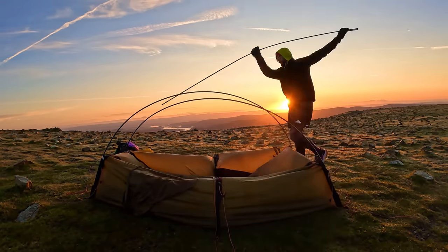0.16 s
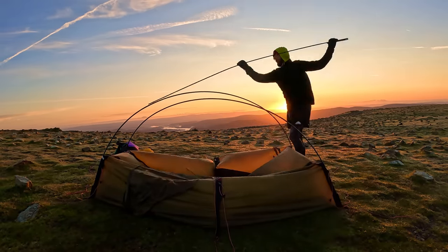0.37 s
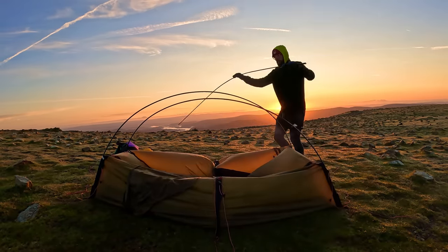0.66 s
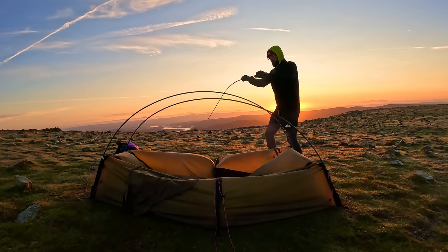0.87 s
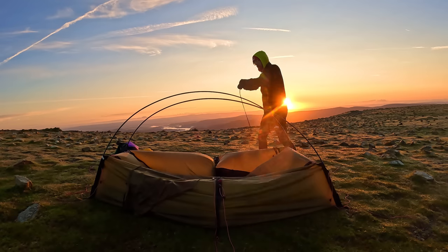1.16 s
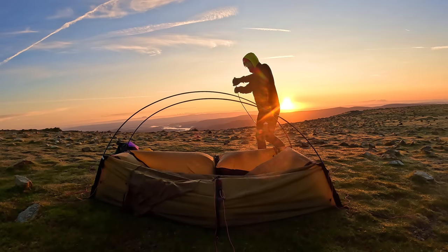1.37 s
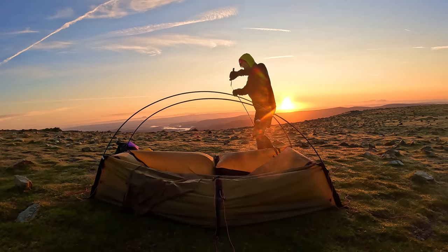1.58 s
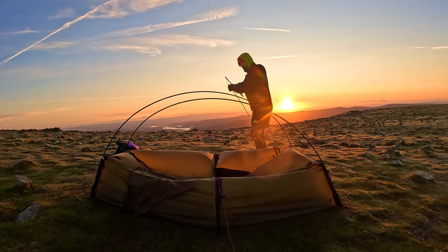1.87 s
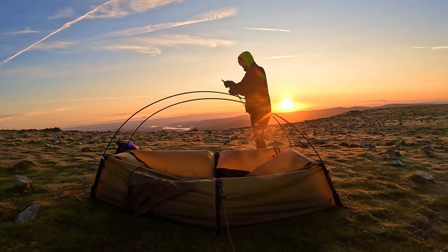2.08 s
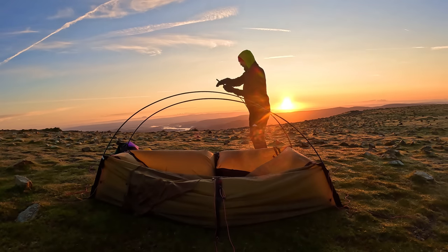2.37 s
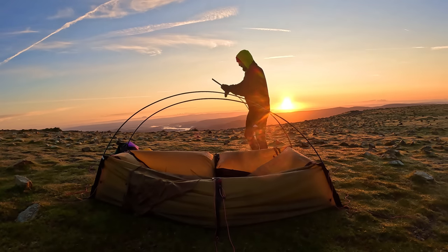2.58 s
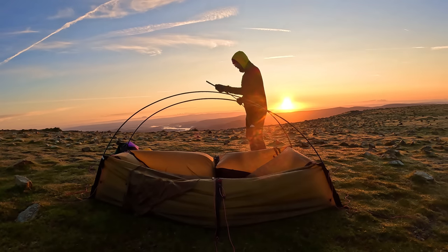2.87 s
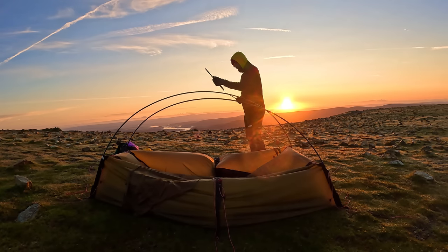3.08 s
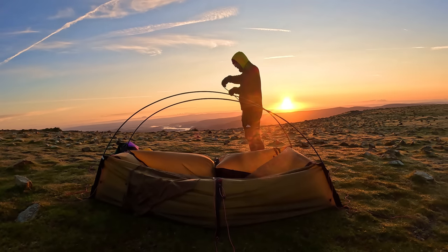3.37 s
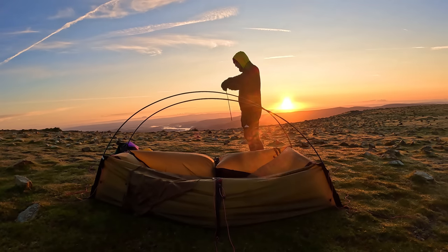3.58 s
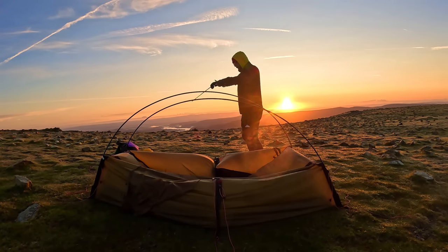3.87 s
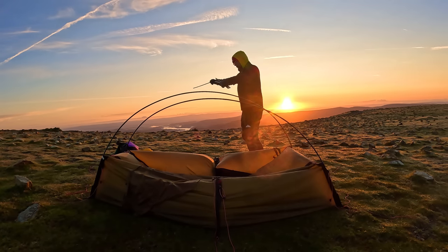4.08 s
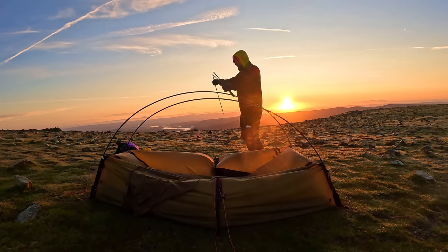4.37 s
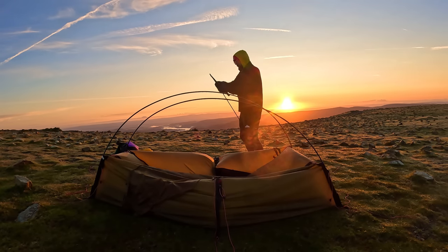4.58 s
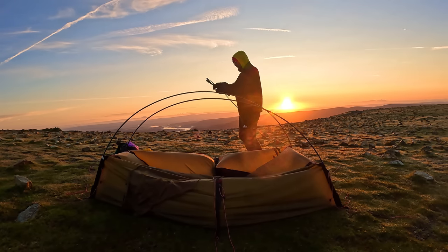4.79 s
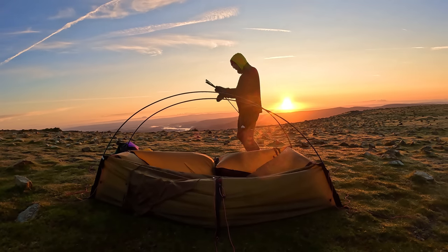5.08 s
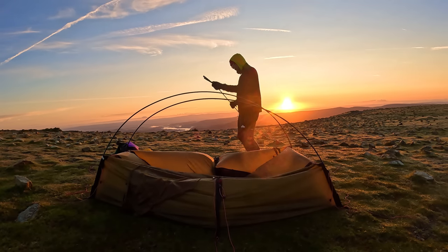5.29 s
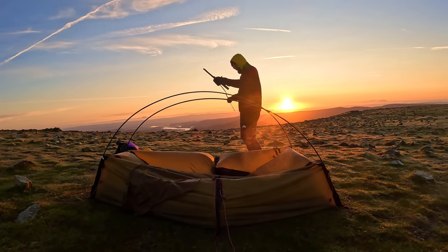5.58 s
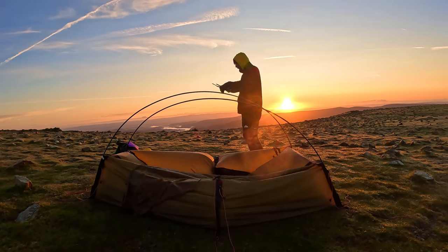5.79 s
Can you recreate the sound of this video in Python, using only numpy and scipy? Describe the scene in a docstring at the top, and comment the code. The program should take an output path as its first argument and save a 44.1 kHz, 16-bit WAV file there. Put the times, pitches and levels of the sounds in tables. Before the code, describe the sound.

Outdoors, wind rumbles on the microphone and washes through grass. A tent pole gives a short hollow ring and slides through rustling nylon. Then its thin metal sections scrape out of their joints and clack together in irregular, sharp clicks a few metres away. A small bird whistles faintly a few times, and the wind thumps harder near the end.

```python
"""An open moor, where a tent pole is drawn from its sleeve and folded section by section a few metres off.
The thin metal tubes scrape out of their joints and clack together, choked by the hands, while the loose
sections ring faintly on their cord. Nylon rustles, feet press the turf and a small bird whistles four
times. Under it all, wind washes through the grass and rumbles on the two ports of the microphone."""
import sys
import numpy as np
from scipy import signal
from scipy.fft import rfft, irfft
from scipy.io import wavfile
from scipy.ndimage import uniform_filter1d

SR = 44100
rng = np.random.default_rng(int(sys.argv[2]) if len(sys.argv) > 2 else 0)


def unload_wav(signal):
    """Save mono or channel-first audio to the path in sys.argv[1] as 16-bit WAV at rate SR, clipped to [-1, 1]."""
    wavfile.write(
        sys.argv[1],
        SR,
        np.round(np.clip(np.atleast_2d(signal).T, -1, 1) * 32767).astype(np.int16),
    )


N = 261954
TIME = np.arange(N) / SR

# Table levels are relative: they set the balance within a layer, ahead of its trims and the microphone.
# a tube sliding in its joint: (time [s], length [s], level [dB], resonance [Hz], width [Hz], grit [ratio])
JOINT_SCRAPES = [(0.0, 0.029, -30.5, 1350, 1330, 0.055), (1.6558, 0.004, -27.5, 1980, 400, 0.3),
                 (2.137, 0.04, -26.5, 3350, 500, 0.65), (2.15, 0.011, -26.5, 5700, 1500, 0.3),
                 (2.151, 0.015, -27.5, 2800, 3000, 0.2), (2.2, 0.012, -40, 3100, 2000, 4.1),
                 (2.421, 0.009, -38.5, 4600, 1500, 0.57), (2.653, 0.017, -36, 4630, 2500, 1.2),
                 (2.979, 0.007, -40, 5660, 900, 0.16), (3.003, 0.0084, -38, 6300, 1200, 0.14),
                 (3.593, 0.022, -35, 2950, 450, 0.34), (4.376, 0.0095, -43.5, 1780, 1500, 0.18),
                 (4.461, 0.013, -31, 2910, 1000, 3.6), (4.862, 0.022, -41, 1010, 398, 0.67),
                 (4.9, 0.09, -57, 1900, 1800, 0.65), (5.272, 0.019, -40, 1070, 400, 0.066)]
# the whole pole ringing as it comes free: (pitch [Hz], level [dB], t60 [s])
POLE_MODES = [(865, -34, 0.14), (910, -29, 0.14), (1160, -29, 0.14), (2750, -20.5, 0.026)]
# loose sections hanging on the cord: (pitch [Hz], level [dB], t60 [s])
SECTION_MODES = [(1468, -41, 0.36), (2057, -42, 0.15), (2888, -37, 0.14), (3040, -34, 0.11),
                 (3235, -42, 0.2), (4400, -32, 0.06), (5856, -22, 0.021)]

# the steady bed of wind on the ports: (time [s], level [dB])
BREEZE_LEVEL = [(0, -32.5), (0.65, -34.5), (1.2, -40.5), (1.7, -45), (2.05, -39.5), (2.33, -50),
                (2.55, -42.5), (2.75, -48), (3.3, -45), (3.47, -50), (4.35, -35.5), (4.57, -45),
                (5.02, -43.5), (5.09, -49), (5.18, -32.5), (5.48, -23.5), (5.75, -34), (5.93, -32)]
# gusts riding on that bed: (peak time [s], length [s], level [dB])
WIND_GUSTS = [(0.155, 0.05, -31.5), (0.295, 0.092, -33.5), (0.56, 0.21, -33.5), (0.7, 0.087, -31.5),
              (0.845, 0.08, -31), (0.99, 0.17, -38.5), (1.275, 0.038, -33.5), (1.43, 0.089, -38),
              (1.83, 0.1, -35.5), (1.95, 0.05, -31), (2.14, 0.13, -37), (3.6, 0.095, -34),
              (3.73, 0.081, -39.5), (4.04, 0.12, -33), (4.17, 0.013, -49), (4.42, 0.12, -30),
              (4.505, 0.02, -32), (4.97, 0.084, -29), (5.67, 0.028, -28), (5.88, 0.076, -28)]
# tone of the turbulence: (frequency [Hz], gain [dB])
RUMBLE_EQ = [(30, -15), (60, -21.5), (85, 0), (120, -0.5), (180, -3), (250, -8.5), (330, -15.5),
             (450, -26.5), (700, -36), (1500, -39), (3000, -53), (6000, -80)]
# single eddies thumping the ports: (time [s], peak level [dB], pitch [Hz])
WIND_BUFFETS = [(0.2638, -21.5, 180), (0.52, -26, 190), (0.597, -24, 160), (1.949, -23, 210),
                (4.42, -19, 133), (5.449, -10, 148)]
# wind in the grass all around: (time [s], level [dB])
GRASS_LEVEL = [(0, -45), (1.0, -49.5), (1.7, -47.5), (3.3, -50), (3.87, -48.5), (4.7, -51), (5.03, -48.5),
               (5.09, -58), (5.2, -50), (5.93, -51)]
# tone of that wash: (frequency [Hz], gain [dB])
GRASS_EQ = [(100, -54), (400, 2), (800, 1.5), (1400, 4.5), (2500, -4), (4000, -10.5), (8000, -38),
            (16000, -1)]

# steady fabric rub, strongest as the pole leaves its sleeve: (time [s], level [dB])
NYLON_LEVEL = [(0, -49.5), (0.38, -49.5), (0.72, -46.5), (0.95, -50.5), (1.58, -48.5), (1.76, -54),
               (2.9, -50), (3.17, -55.5), (3.9, -51), (4.3, -55), (4.75, -52.5), (5.15, -58.5),
               (5.93, -53.5)]
# tone of the fabric hiss: (frequency [Hz], gain [dB])
NYLON_EQ = [(500, -12), (2000, 1.5), (4000, 2.5), (5300, 6.5), (7300, 4.5), (8500, 0), (9600, -2.5),
            (12000, -5), (16000, -3.5)]
# single swishes of the jacket: (peak time [s], length [s], level [dB])
JACKET_SWISHES = [(0.07, 0.17, -42.5), (3.84, 0.023, -47), (3.97, 0.064, -50), (4.53, 0.17, -47.5),
                  (4.84, 0.051, -39.5), (4.945, 0.14, -43.5), (5.44, 0.083, -42.5)]

# tube hitting tube: (time [s], rebound delay [ms], rebound strength [ratio], knock pitch [Hz],
# knock level [dB], ring pitch [Hz], ring level [dB], tick pitch [Hz], tick level [dB])
TUBE_HITS = [(0.085, 1.6, 0.36, 2750, -49, 8050, -39, 9500, -40),
             (1.587, 0.6, 0.13, 2420, -32.5, 6900, -32.5, 9460, -35.5),
             (1.6701, 2.38, 1.4, 2110, -30.5, 5040, -53, 11300, -44),
             (1.747, 1.37, 0.44, 2270, -42.5, 5560, -61, 10700, -45),
             (2.1132, 1.4, 0.32, 1440, -25, 4430, -26, 9700, -27.5),
             (2.118, 2.6, 0.37, 2490, -34, 4500, -30, 9500, -45),
             (2.1698, 1.0, 0.4, 3000, -28.5, 7300, -37, 7900, -48),
             (2.3848, 2.5, 0.69, 2020, -31.5, 5730, -21, 9250, -23),
             (2.5756, 2.0, 0.37, 1940, -47, 6070, -44.5, 9250, -55),
             (2.621, 2.46, 0.5, 2000, -32.5, 4070, -28, 9500, -32.5),
             (2.6671, 2.9, 1.7, 1720, -35, 5900, -30, 9200, -39),
             (2.8299, 1.5, 0.32, 1390, -39.5, 6850, -31.5, 9300, -49),
             (2.833, 2.5, 0.44, 1200, -37.5, 5500, -43.5, 9400, -39),
             (3.0248, 1.6, 0.36, 1610, -40.5, 6660, -44.5, 9600, -47),
             (3.429, 2.2, 0.11, 2620, -29.5, 6040, -30, 9700, -36),
             (3.6015, 2.4, 0.62, 3000, -28.5, 5540, -34.5, 9550, -46),
             (3.642, 2.5, 0.41, 1560, -36, 6070, -49, 9450, -55),
             (3.6762, 2.9, 0.49, 1440, -47, 5730, -43, 9400, -53),
             (3.743, 2.7, 0.5, 2550, -27, 5780, -18, 9100, -26),
             (3.7623, 1.3, 0.34, 2410, -55, 6940, -35, 11200, -34),
             (4.2012, 2.05, 0.43, 2290, -21, 6800, -27, 10560, -30.5),
             (4.4532, 2.57, 0.93, 3000, -31, 6340, -21.5, 11200, -24),
             (4.4659, 2.1, 0.58, 3100, -29, 5700, -41, 9600, -37),
             (4.5308, 0.43, 0.8, 2550, -30, 6900, -23.5, 11200, -27),
             (4.5325, 1.4, 0.36, 2900, -33.5, 6770, -29, 8740, -27),
             (4.565, 2, .6, 2900, -48, 7200, -49, 9200, -49),
             (4.596, 1.8, 1, 2620, -41.5, 6300, -40.5, 9400, -60),
             (4.833, 1.8, 0.52, 2700, -39.5, 6350, -28, 9500, -41),
             (4.8506, 2.3, 0.56, 2630, -32.5, 5300, -24, 10300, -27),
             (4.888, 1.6, 0.67, 3070, -43, 6150, -42, 10500, -45),
             (4.919, 2.2, 0.88, 2730, -51, 6040, -43, 11000, -40),
             (4.932, 2, 0.78, 2260, -43, 5240, -40, 9400, -58),
             (4.973, 1.2, 0.54, 2970, -54, 7000, -55, 12500, -44),
             (4.9963, 0.9, 0.11, 2840, -33, 6260, -23.5, 9360, -22),
             (5, 1.8, 0.55, 1780, -41, 6200, -32, 14000, -32),
             (5.021, 1.6, 0.64, 2440, -38.5, 5330, -26.5, 10300, -34),
             (5.0512, 0.6, 2.2, 3220, -43, 6600, -23.5, 9200, -29),
             (5.0547, 0.74, 1.5, 2970, -47, 6350, -31.5, 9100, -46),
             (5.334, 1.8, 0.79, 1640, -40.5, 4500, -38, 11400, -46),
             (5.3432, 1.167, 1.2, 2500, -40.5, 6200, -22, 11300, -24),
             (5.6012, 1.5, 0.64, 1120, -56, 6940, -49, 11500, -42),
             (5.674, 1.9, 0.22, 2190, -37.5, 5530, -44, 9300, -66),
             (5.8286, 2.0, 0.54, 2200, -39.5, 6050, -42.5, 9500, -55),
             (5.9149, 3.6, 0.21, 3370, -38, 5370, -40.5, 9300, -52)]
# a harder hit is a shorter contact and reaches higher: (ring level [dB], top edge [Hz])
HIT_BRIGHTNESS = [(-28, 12000), (-22, 15800)]
# feet on turf: (peak time [s], length [s], level [dB])
FOOTFALLS = [(0.535, 0.07, -48), (1.13, 0.048, -47.5)]
# bird whistles: (time [s], level [dB], glide as a list of (time into the call [ms], pitch [Hz]))
BIRD_CALLS = [(1.524, -52, [(0, 6100), (20, 6750), (38, 6600), (58, 7100), (78, 6000)]),
              (3.227, -41, [(0, 5800), (16, 6650), (20, 7350), (27, 6600), (33, 7250), (45, 6650),
              (56, 7250), (66, 6300), (72, 5200)]), (3.372, -44, [(0, 5600), (21, 6650), (37, 6250),
              (50, 6650), (62, 7350), (72, 7250), (80, 6300)]), (4.59, -39.5, [(0, 5700), (17, 6450),
              (30, 6700), (39, 6250), (58, 7250), (66, 6800), (73, 5400)])]
# bursts of top-end sizzle, mostly in strong gusts: (peak time [s], length [s], level [dB])
SIZZLE_SWELLS = [(4.38, 0.095, -52), (4.5, 0.08, -39), (4.99, 0.11, -44), (5.24, 0.033, -52),
                 (5.42, 0.21, -52), (5.58, 0.13, -60)]

# how far the left port trails the right: (frequency [Hz], phase lag [rad])
LEFT_PORT_LAG = [(100, 0.23), (3700, 0.76), (7000, 0.11), (10600, .05), (12500, 1), (16000, .6)]
# response of the microphone behind its ports: (frequency [Hz], gain [dB])
MIC_EQ = [(40, -23), (56, -21), (68, -8.5), (80, 1.5), (3150, 1), (3370, -7.5), (3470, -17), (3570, -3),
          (3750, -1.5), (4000, -6.5), (4300, 0), (7600, 3), (8400, 0.5), (9600, 4.5), (10500, -8.5),
          (12300, -12.5), (14500, -23.5), (16000, -26)]


def amp(db):
    """Decibels to gain."""
    return 10 ** (np.asarray(db) / 20)


def unit(x):
    """Normalises to rms 1."""
    return x / np.sqrt(np.mean(x ** 2) + 1e-20)


def fader(curve):
    """A fader ride through (time [s], level [dB]) points, as a gain for every sample."""
    return amp(np.interp(TIME, *np.transpose(curve)))


def swells(rows):
    """Summed power of bell-shaped swells: (peak time [s], length [s], level [dB])."""
    return sum(amp(db) ** 2 * np.exp(-(2 * (TIME - s) / length) ** 2) for s, length, db in rows)


def eq_gain(points, hz):
    """Gain along an EQ curve of (frequency [Hz], gain [dB]) points on a log-frequency axis."""
    point_hz, db = np.transpose(points)
    return amp(np.interp(np.log(hz + 1), np.log(point_hz), db))


def coloured(x, points):
    """Shapes noise with an EQ curve, at rms 1."""
    return unit(irfft(rfft(x) * eq_gain(points, np.fft.rfftfreq(N, 1 / SR)), N))


def add(mix, s, sound):
    """Drops a sound into the mix at s seconds."""
    start = round(s * SR)
    sound = sound[..., max(-start, 0):]
    part = mix[..., max(start, 0):][..., :sound.shape[-1]]
    part += sound[..., :part.shape[-1]]


def butter(hz, kind, order=3):
    """Butterworth filter sections."""
    return signal.butter(order, hz, kind, fs=SR, output="sos")


def band(x, lo_hz, hi_hz, order=3):
    """Causal band-pass."""
    return signal.sosfilt(butter([lo_hz, min(hi_hz, .49 * SR)], "band", order), x)


def resonate(x, hz, width_hz):
    """One resonant peak at unity gain."""
    return signal.lfilter(*signal.iirpeak(hz, hz / width_hz, fs=SR), x)


def drift(rate_hz):
    """Smooth random modulation at rms 1."""
    rolloff = np.exp(-(np.fft.rfftfreq(N, 1 / SR) / rate_hz) ** 2)
    return unit(irfft(rfft(rng.standard_normal(N)) * rolloff, N))


def stereo_noise(correlation, count=N):
    """White noise, from wide (0) to mono (1)."""
    shared = rng.standard_normal(count)
    return np.sqrt(correlation) * shared + np.sqrt(1 - correlation) * rng.standard_normal((2, count))


def pan(x, left_db):
    """Sets the left channel this many dB above the right."""
    return x * amp([[left_db / 2], [-left_db / 2]])


def scrapes(attack_s=0.00031, release_s=0.013, judder_db=1.5, judder_hz=400, slips_per_s=800, slip_size=13):
    """Metal sticks and slips in a joint: dense tiny hits ring the tube and put grit on top."""
    out, t = np.zeros((2, N)), TIME[:SR // 10]
    for s, length, db, hz, width_hz, grit in JOINT_SCRAPES:
        pressure = (1 - np.exp(-t / attack_s)) * np.exp(-np.maximum(t - length, 0) / release_s)
        pressure *= unit(amp(judder_db * drift(judder_hz)[:len(t)]))
        slips = slip_size * rng.choice([-1, 1], len(t)) * (rng.random(len(t)) < slips_per_s / SR)
        force = slips + stereo_noise(0.99, len(t))
        tube = unit(band(resonate(force, hz, width_hz), 930, 7400, order=2))
        hiss = unit(band(force, 2130, 7600, order=2))
        add(out, s, amp(db) * pressure * unit(tube + grit * hiss))
    return out


def pole_ring():
    """The whole pole gives one short hollow ring as it comes free, right at the start."""
    return sum(amp(db - 60 * TIME / t60) * np.sin(2 * np.pi * (hz * TIME + rng.random()))
               for hz, db, t60 in POLE_MODES)


def loose_sections(x, send_db=-23, uneven_db=3):
    """Adds the faint after-ring of the free tubes; chance sets how strongly each mode answers."""
    t = TIME[:SR // 4]
    ring = sum(amp(db + uneven_db * rng.uniform(-0.43, 1) - 60 * t / t60) * np.sin(2 * np.pi * hz * t)
               for hz, db, t60 in SECTION_MODES)
    return x + amp(send_db) * signal.fftconvolve(x, ring[None], axes=1)[:, :x.shape[1]]


def wind_strength():
    """Gusts on top of the breeze, as a gain for every sample."""
    return np.sqrt(fader(BREEZE_LEVEL) ** 2 + swells(WIND_GUSTS))


def wind(trim_db=1.04, lumps_db=1.7, brighten=0.44, crossover_hz=150):
    """Lumpy turbulence on the ports: deep rumble, small eddies that open up in gusts, a few thumps."""
    strength = wind_strength()
    deep = signal.sosfilt(butter(crossover_hz, "low"), coloured(stereo_noise(0.59), RUMBLE_EQ))
    eddies = signal.sosfilt(butter(crossover_hz, "high"), coloured(stereo_noise(0.26), RUMBLE_EQ))
    rumble = deep + pan(eddies, left_db=-4.5) * unit(strength) ** brighten
    rumble /= np.sqrt(uniform_filter1d((rumble ** 2).mean(0), size=3000))  # flatten, so the gusts lead
    out = unit(rumble * amp(lumps_db * drift(32))) * strength * amp(trim_db)
    for s, db, hz in WIND_BUFFETS:
        cycles = (TIME - s) * hz
        thump = np.exp(-(cycles / 0.74) ** 2) * np.cos(2 * np.pi * cycles)
        out += pan(amp(db) * thump, left_db=-4)
    return out


def grass(gust_db=-50.5, gust_follow=0.7, flutter_db=1.1):
    """A wide, even wash of wind over the moor; it lifts with the gusts, but by less."""
    level = np.hypot(fader(GRASS_LEVEL), amp(gust_db) * unit(wind_strength()) ** gust_follow)
    flutter = amp(flutter_db * drift(30))
    return pan(coloured(stereo_noise(0.2), GRASS_EQ) * level * flutter, left_db=-3.5)


def nylon(trim_db=0.52, top_hz=10500, brighten=0.62, flutter_db=1.5, creases_per_s=220, crease_size=2.4):
    """Rubbing fabric hisses, brighter on quick moves, and small creases snap."""
    # an arm movement leads into every clack, louder for a harder hit
    lead_s, reach_s, reach_db, hit_follow = 0.01, 0.048, -36, 0.45
    reaches = [(s - lead_s, reach_s, reach_db + hit_follow * max(knock_db, ring_db))
               for s, _, _, _, knock_db, _, ring_db, _, _ in TUBE_HITS]
    motion = np.sqrt(fader(NYLON_LEVEL) ** 2 + swells(JACKET_SWISHES + reaches))
    creases = crease_size * rng.laplace(size=N) * (rng.random(N) < creases_per_s / SR)
    hiss = coloured(stereo_noise(0.54) + creases, NYLON_EQ)
    top = signal.sosfiltfilt(butter(top_hz, "high"), hiss)
    hiss += top * (unit(motion) ** brighten - 1)
    return hiss * motion * amp(trim_db + flutter_db * drift(40))


def clacks(strike=3.8, graze_db=-26, graze_s=0.0062, tail_db=-28, tail_s=0.023, lead_s=0.03):
    """Two tubes graze, strike, rebound and chatter; the gripping hands choke their ring at once."""
    knock_trim_db, ring_trim_db, tick_trim_db = 1.0, 3.5, 1.5
    out = np.zeros((2, N))
    t = np.arange(-round(lead_s * SR), SR // 5) / SR
    transient = (t >= 0) & (t < .007)  # each band's level is set over these first 7 ms
    graze = amp(graze_db) * np.exp(-abs(t) / graze_s)
    tail = amp(tail_db) * np.exp(-abs(t) / tail_s)
    rubbing = np.where(t < 0, graze, tail)
    for s, rebound_ms, rebound, knock_hz, knock_db, ring_hz, ring_db, tick_hz, tick_db in TUBE_HITS:
        gap_s = rebound_ms / 1000
        force = stereo_noise(1.0, len(t)) * rubbing
        contact = stereo_noise(0.97, 1000) * np.exp(-TIME[:1000] / gap_s)  # brief chatter
        contact[:, 0] += strike
        add(force, lead_s, contact)
        add(force, lead_s + gap_s, rebound * contact)  # the repeat combs the hit, making it hollow
        snap = .65 * amp(np.clip(ring_db - knock_db, -5, 0)) ** 3  # sharp hits snap, dull ones have pitch
        knock = band(resonate(force, knock_hz, 420) + snap * force, 1140, 4030, order=4)  # tube bending
        ring = band(resonate(force, ring_hz, 810) + 0.33 * force, 3825, 7660, order=4)  # tube wall
        edge = resonate(force, tick_hz, 250) + 0.37 * force + resonate(force, 14800, 700)
        top_hz = np.interp(ring_db, *np.transpose(HIT_BRIGHTNESS))
        tick = band(edge, 7630, top_hz, order=4)
        layers = [(pan(knock, left_db=-0.8), knock_db + knock_trim_db),
                  (ring, ring_db + ring_trim_db),
                  (pan(tick, left_db=4.5), tick_db + tick_trim_db)]
        hit = sum(amp(db) * layer / np.sqrt(np.mean(layer[:, transient] ** 2)) for layer, db in layers)
        add(out, s - lead_s, loose_sections(hit))
    return out


def footsteps():
    """Feet press the turf: soft swells of midrange noise."""
    return unit(band(stereo_noise(0.84), 350, 1300, order=2)) * np.sqrt(swells(FOOTFALLS))


def cord_rub(peak_s=0.7, half_length_s=0.075, hz=1390, rise_hz_per_s=600, level_db=-47):
    """A soft, hollow tone that rises as the cord rubs along the pole."""
    friction = signal.sosfilt(butter(110, "low", order=2), stereo_noise(0.72))
    pitch = hz + rise_hz_per_s * (TIME - peak_s)
    tone = friction * np.cos(2 * np.pi * np.cumsum(pitch) / SR)
    return amp(level_db) * unit(tone) * np.exp(-((TIME - peak_s) / half_length_s) ** 4)


def bird(fade_share=0.3, waver_db=2.2):
    """Thin, distant warbles, each a pure gliding tone that wavers in level."""
    out = np.zeros(N)
    for s, db, glide in BIRD_CALLS:
        ms, hz = np.transpose(glide)
        t_ms = 1000 * TIME[1000 * TIME < ms[-1]]
        pitch = uniform_filter1d(np.interp(t_ms, ms, hz), size=130)
        whistle = np.sqrt(2) * np.sin(2 * np.pi * np.cumsum(pitch) / SR)
        add(out, s, amp(db) * whistle * signal.windows.tukey(len(pitch), fade_share))
    return pan(out * amp(waver_db * drift(90)), left_db=5.5)


def sizzle(grains_per_s=2500):
    """Fine grains fizz in the top treble."""
    grains = rng.standard_normal((2, N)) * (rng.random(N) < grains_per_s / SR)
    return unit(band(grains, 10500, 14000)) * np.sqrt(swells(SIZZLE_SWELLS))


def moor_scatter(x, send_db=-23, t60=0.055, predelay_s=0.006, echoes_per_s=2000):
    """No walls: only a faint, short scatter off the tent and the tussocks."""
    t = TIME[:SR // 4]
    taps = rng.standard_normal((2, len(t))) * (rng.random((2, len(t))) < echoes_per_s / SR)
    taps *= amp(-60 * t / t60) * (t > predelay_s)
    return x + amp(send_db) * signal.fftconvolve(x, taps / np.linalg.norm(taps[0]), axes=1)[:, :N]


def ports(x):
    """Sound from in front reaches the left port a touch late."""
    lag = np.interp(np.fft.rfftfreq(N, 1 / SR), *np.transpose(LEFT_PORT_LAG))
    return np.array([irfft(rfft(x[0]) * np.exp(-1j * lag), N), x[1]])


def gain_control(x, threshold_db=-11, slope=0.046, release_db_per_s=65, attack_s=0.0023):
    """Gentle compression: the level ducks just after a loud peak and comes back quickly."""
    fall_db = TIME * release_db_per_s
    level_db = 20 * np.log10(abs(x).max(0) + 1e-9)
    held_db = np.maximum.accumulate(level_db + fall_db) - fall_db
    duck_db = slope * np.maximum(held_db - threshold_db, 0)
    smoothing = np.exp(-1 / (attack_s * SR))
    return x / amp(signal.lfilter([1 - smoothing], [1, -smoothing], duck_db))


def scene():
    """The mix: pole, bird, fabric and feet in front, over a bed of wind."""
    pole = pan(clacks() + loose_sections(scrapes() + pole_ring()), left_db=-1.0)
    front = moor_scatter(pole + bird()) + cord_rub() + nylon() + footsteps()
    return ports(front) + sizzle() + grass() + wind()


def record(dry, ceiling=0.96, cutoff_hz=16500):
    """The output chain: microphone colour, gain control, a soft clip on the hardest hits, a low-pass."""
    log_gain = np.log(eq_gain(MIC_EQ, abs(np.fft.fftfreq(4096, 1 / SR))))
    mic_impulse = np.fft.ifft(np.exp(np.conj(signal.hilbert(log_gain)))).real  # minimum phase
    ducked = gain_control(signal.oaconvolve(dry, mic_impulse[None], axes=1)[:, :N])
    clipped = ducked / (1 + (ducked / ceiling) ** 6) ** (1 / 6)
    low_pass = signal.firwin(511, cutoff_hz, window=("kaiser", 9), fs=SR)
    return signal.oaconvolve(clipped, low_pass[None], "same")


dry = scene()
out = record(dry)
unload_wav(out)
```